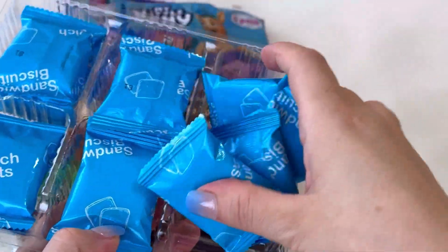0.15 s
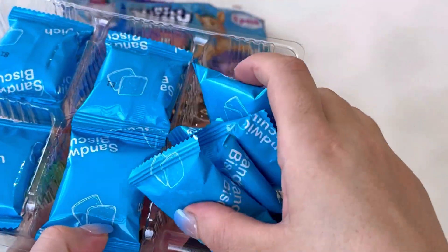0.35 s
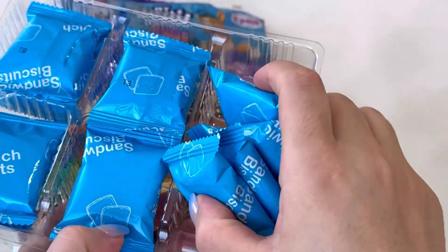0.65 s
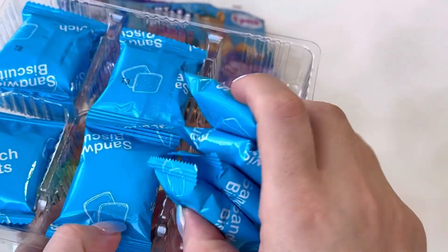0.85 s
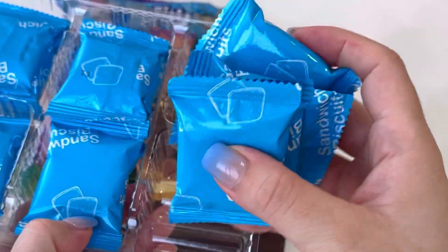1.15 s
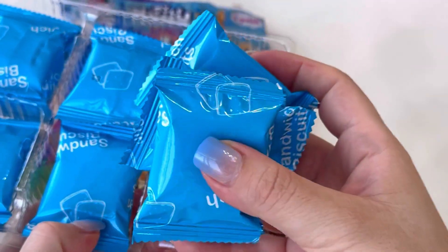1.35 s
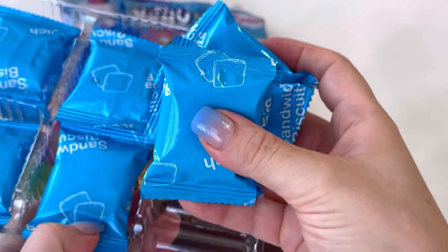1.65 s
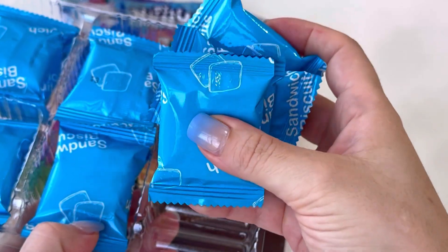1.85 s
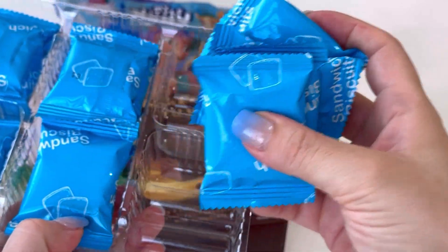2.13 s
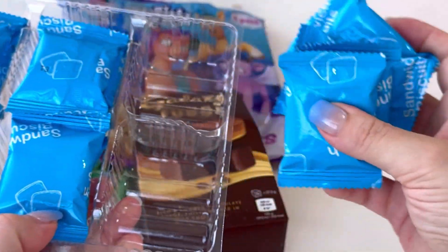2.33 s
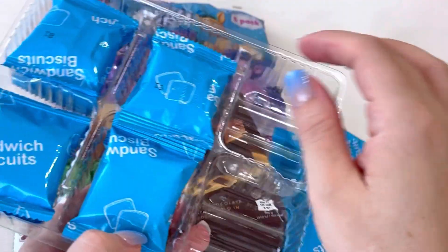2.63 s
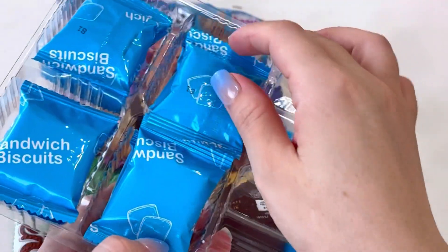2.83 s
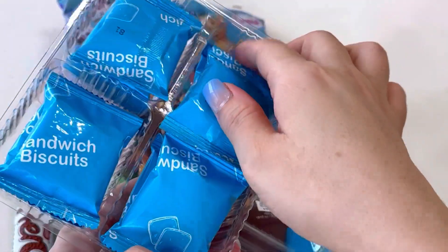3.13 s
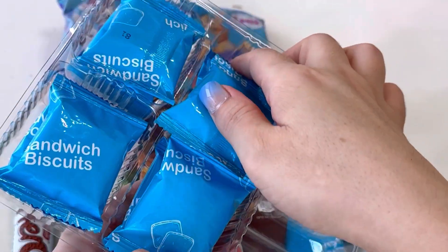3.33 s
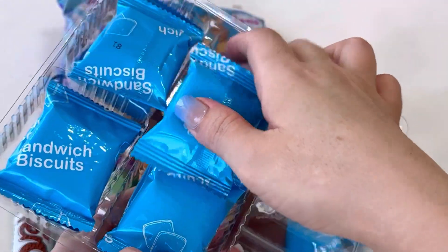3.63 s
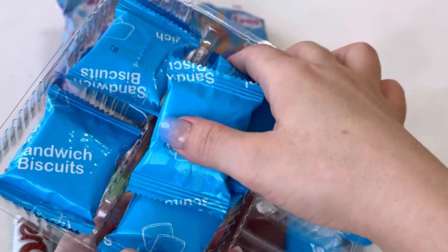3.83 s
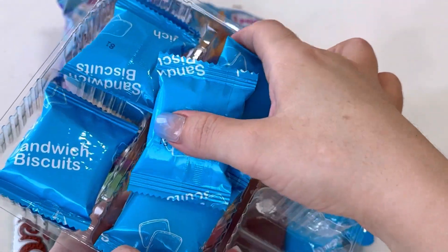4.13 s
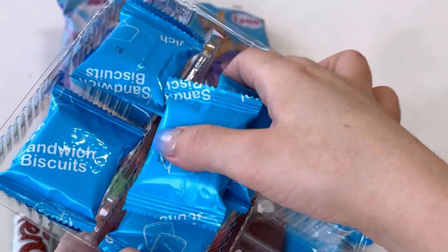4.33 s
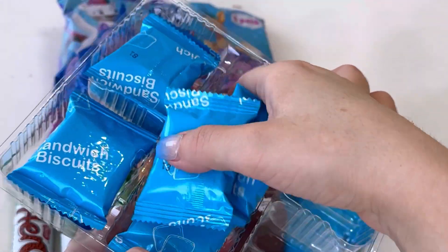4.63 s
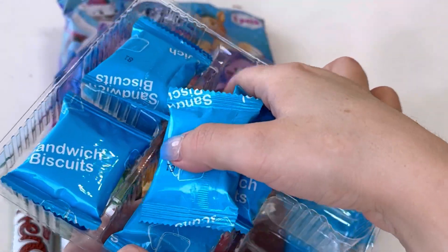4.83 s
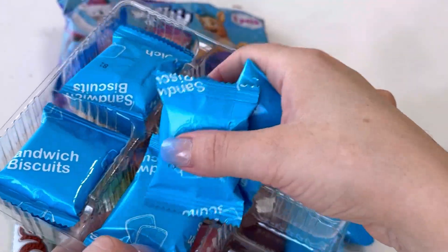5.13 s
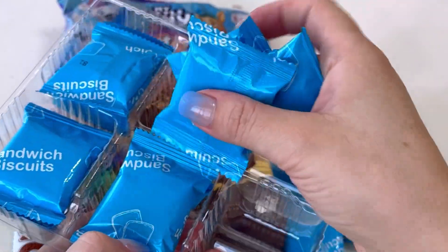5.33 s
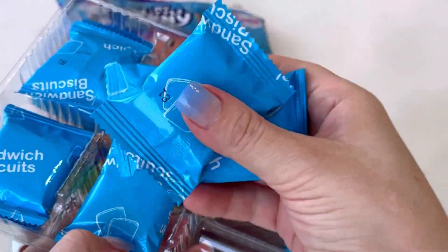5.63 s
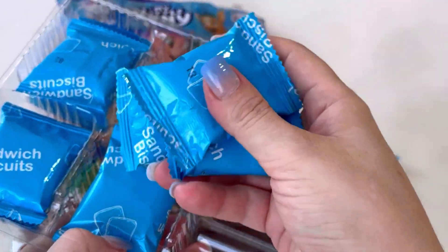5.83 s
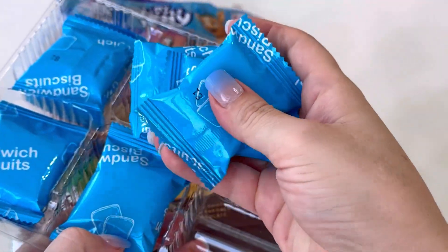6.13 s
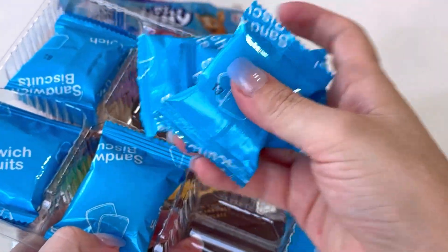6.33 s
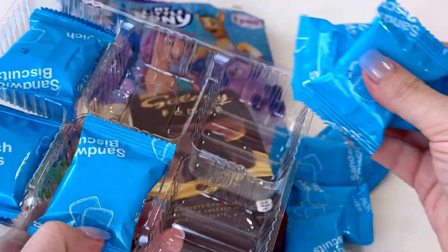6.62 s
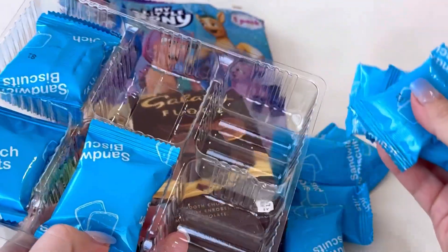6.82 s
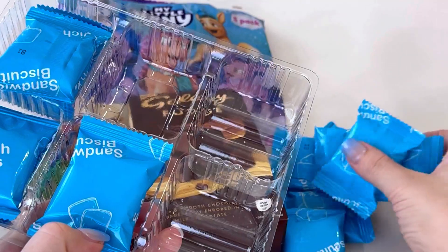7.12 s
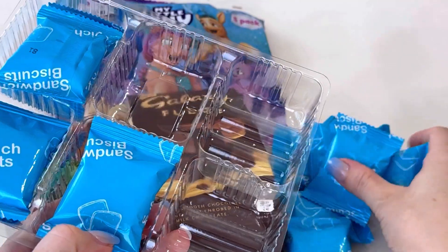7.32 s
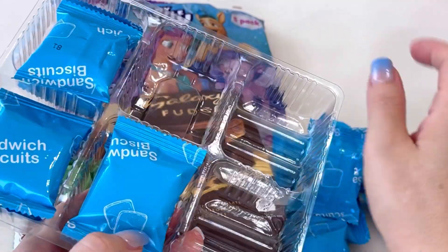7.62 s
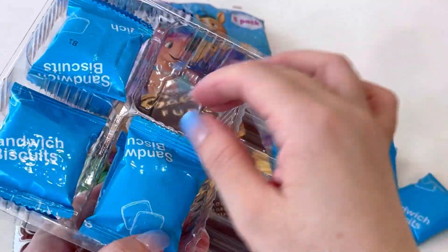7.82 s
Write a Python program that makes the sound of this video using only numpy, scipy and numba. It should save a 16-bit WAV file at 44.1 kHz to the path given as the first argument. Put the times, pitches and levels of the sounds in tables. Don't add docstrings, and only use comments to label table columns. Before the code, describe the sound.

Fingers grab wrapped biscuits: dry film crackle and hollow plastic ticks for about a second, then near quiet with tiny rustles. Digging starts again with thick crunchy crinkling, peaking in hard pops that leave the tray briefly ringing. It eases into lighter crinkles, a brush of film and dull low bumps on a table. Close stereo pickup, light room echo, steady low hum.

```python
import sys
import numpy as np
from scipy import signal
from scipy.fft import rfft, irfft
from scipy.io import wavfile
from scipy.ndimage import uniform_filter1d
from numba import njit

SR = 44100
rng = np.random.default_rng(int(sys.argv[2]) if len(sys.argv) > 2 else 0)


def store_wav(level_fs):
    pcm = np.round(np.clip(np.atleast_2d(level_fs), -1, 1) * 32767)
    wavfile.write(sys.argv[1], SR, pcm.T.astype(np.int16))


def decibels_to_gain(level_db):
    exponent = np.asarray(level_db, float) / 20
    return 10 ** exponent


N = 351456
LEFT_RIGHT = np.array([[1], [-1]])


def level(x, db):
    return x * decibels_to_gain(db) / np.sqrt(np.mean(x ** 2))


def curve(table, column):
    rows = np.array(table, float)
    return np.interp(np.arange(N) / SR, rows[:, 0], rows[:, column], left=-120, right=-120)


def shaped(gain, channels=1):
    hz = np.maximum(np.fft.rfftfreq(N, 1 / SR), 1)
    noise = rng.standard_normal((channels, N))
    return level(irfft(rfft(noise) * gain(hz), N), 0)


def resonance(f, hz, width):
    return 1 / np.hypot(1, 2 * (f - hz) / width)


def walk(rate):
    held = int(SR / rate)
    steps = np.repeat(rng.standard_normal(N // held + 1), held)
    return uniform_filter1d(steps, held // 2)[:N]


def bells(table):
    t = np.arange(N) / SR
    return [(row, np.exp(-((t - row[0]) / row[-1]) ** 2)) for row in table]


# pitch in Hz, width in Hz, level in dB.
HUM_LINES = [
    (50, 38, -62.5),
    (99.3, 17, -62.5),
    (196, 25, -72.5),
    (522, 14, -78.5),
]
# pitch in Hz, strength in dB per Hz.
AIR_COLOUR = [(25, -38.5), (45, -8.5), (70, -41), (130, -16), (280, -22.5), (600, -41), (3000, -60.5),
              (16000, -73)]


def background():
    turn = 2 * np.pi * np.arange(N) / SR
    hum = 0
    for hz, width, db in HUM_LINES:
        steady = (1.1 if hz < 150 else .3) * np.sin(hz * turn)
        unsteady = 0.79 * shaped(lambda f: resonance(f, hz, width))
        hum = hum + decibels_to_gain(db) * (steady + unsteady)
    hz, db = np.transpose(AIR_COLOUR)
    mid, side = shaped(lambda f: decibels_to_gain(np.interp(np.log(f), np.log(hz), db)), channels=2)
    return hum + decibels_to_gain(-68) * (mid + .2 * side * LEFT_RIGHT)


# start in seconds, strength in dB, sharpness in dB, share of the tray in dB.
GRAB = [(0.052, -41, -13, 8), (0.0825, -45.5, 13.5, -20.5), (0.0881, -31, 6, -3.5), (0.1221, -26, 13, -23),
        (0.218, -43.5, -8.5, 4), (0.2394, -42.5, 7, -31), (0.328, -27.5, -3.5, -5),
        (0.3689, -54, -1.5, -18), (0.3846, -47.5, 35, -31), (0.4815, -33.5, -2, -5.5),
        (0.4936, -33, 2.5, -6.5), (0.5244, -52.5, 23.5, -8), (0.5553, -40, -2, 1.5),
        (0.5681, -39, 16.5, -6.5), (0.5905, -31, -4.5, -4.5), (0.6103, -33, 4, -18.5),
        (0.6265, -38, 16.5, -32), (0.6514, -25.5, 4, -7.5), (0.6834, -33, -5.5, 1), (0.7053, -26, -1, -3),
        (0.7415, -35, -14, -3), (0.7489, -33, 4.5, -1.5), (0.791, -49.5, -8, 9), (0.8779, -32, -4, -2.5),
        (0.89, -36, -12, 2.5), (0.9925, -55.5, 16, 6), (1.019, -47.5, -14, 12), (1.0415, -44, 0, 7.5),
        (1.2622, -54.5, 17.5, -16)]
TURN = [(1.4868, -43.5, 0, -9.5), (1.504, -48, 3, -9), (1.5193, -47, 3.5, -52), (1.6334, -50.5, 17, -33),
        (1.6661, -37.5, 15, -16), (1.6719, -35, 0, -20), (1.6793, -44.5, 22, -7), (1.6861, -57, 27, -22),
        (1.871, -52, -5, -19), (1.9095, -44.5, 5, -27), (1.9655, -51.5, -4, -11), (2.0667, -51, -3, -3.5),
        (2.259, -66, 4, -10), (2.2825, -67.5, -1, -9.5), (2.305, -69, 10, -7), (2.3417, -71, 13, 2),
        (2.353, -63, 6, -7), (2.3932, -53, 1, -10), (2.4, -50.5, -1, -52.5), (2.417, -55.5, 9, -6.5),
        (2.5382, -59, -7, -29.5), (2.6074, -56.5, -15, 12.5)]
DIG = [(2.8805, -43.5, -15, 5), (2.913, -43, -7, 5), (3.0061, -47.5, 19, -1), (3.1022, -36.5, -2, 5),
       (3.1173, -35, -2, -6), (3.1388, -36.5, 19.5, -13), (3.1847, -28, -10.5, -12.5),
       (3.304, -31, 1.5, -21.5), (3.3538, -36, -2, -11), (3.3637, -27.5, 4.5, -8.5),
       (3.4291, -27, -7.5, -0.5), (3.439, -36.5, 21.5, -0.5), (3.515, -31.5, -10.5, -2.5),
       (3.5243, -34, -5, 3), (3.535, -39.5, 3, -19), (3.574, -37.5, -9, -4), (3.59, -27.5, 3, -13),
       (3.5953, -28.5, -15, -2.5), (3.603, -29, 8, -10), (3.608, -27.5, -9, 2), (3.6242, -25, 2, -17.5),
       (3.664, -29, -9, 2), (3.685, -37, -17.5, 1), (3.694, -38, 7.5, 7), (3.726, -39, 22, -33),
       (3.7295, -44, -24.5, 12.5), (3.7536, -33, 11, -13.5)]
PULL = [(3.842, -42, -12.5, -5), (3.857, -33.5, -4.5, -1.5), (3.873, -29.5, -5, -8),
        (3.9015, -30, -1.5, -1), (3.9827, -25.5, -0.5, -18.5), (3.999, -30.5, 0.5, -2.5),
        (4.006, -39, 4.5, 9), (4.02, -38, 8, -16), (4.0279, -24.5, 2.5, -14), (4.0872, -41.5, -11, 4.5),
        (4.1045, -38.5, 9.5, -30.5), (4.1332, -45.5, 1.5, 9.5), (4.146, -35, -6.5, -10.5),
        (4.2376, -32, 2.5, -15.5), (4.258, -20.5, 3.5, -11), (4.2634, -21, 3, -19), (4.2678, -15, 1, -2.5),
        (4.2697, -47, 3, -2), (4.2771, -29, -10.5, 7.5), (4.2875, -27.5, 7, 1.5), (4.3412, -30.5, 1, -9.5),
        (4.357, -37.5, 12, -17.5), (4.413, -45.5, -10, 9.5), (4.458, -39, 2.5, -30.5),
        (4.4704, -51, 6, -12.5), (4.481, -43.5, 21, -15), (4.492, -50.5, 19.5, -20), (4.5054, -35, -4, -27)]
LIFT = [(4.5563, -48.5, -13, 2), (4.569, -31, 6, -3), (4.575, -36.5, -12, 6), (4.589, -18, -4, -9),
        (4.5949, -14, 1, -6.5), (4.656, -28, 2, -37), (4.7143, -29.5, 0, -11.5), (4.7348, -24, 4, -8.5),
        (4.7515, -26, 4, -36.5), (4.842, -13, -4.5, -10), (4.9346, -34.5, -1.5, 1), (4.983, -42, 21, -20),
        (4.994, -30, 1.5, -1), (4.9996, -24, 10, -34), (5.0147, -24, 10, -12), (5.0535, -27, -3.5, -1),
        (5.0815, -38, 13.5, -8), (5.1775, -23, 10, -5), (5.2211, -28.5, 17, -31), (5.4235, -48.5, 4, -29),
        (5.454, -43, 7, -13), (5.476, -45, -8, -3), (5.4905, -39, -3, -51), (5.5463, -20, 1, -11.5),
        (5.661, -39.5, 10.5, -32), (5.688, -35.5, 0, -39), (5.7276, -36.5, 3.5, -26),
        (5.9295, -41.5, -3, -14)]
DROP = [(6.288, -39.5, 2, -36), (6.32, -37.5, 2.5, -54), (6.3915, -46.5, -17.5, -28), (6.4654, -37, 9, -13),
        (6.565, -35, 17.5, -25), (6.568, -32.5, 16, -28), (6.591, -35, 8, -17), (6.597, -43.5, -33, 5),
        (6.606, -35.5, -11, 5.5), (6.6142, -35, 16.5, 1.5), (6.6394, -35.5, -5, 0.5),
        (6.7646, -44, 3, -1.5), (6.772, -21, 8.5, -6.5), (6.802, -44, -12, -24), (6.9734, -40.5, 7.5, -27),
        (7.0818, -35, 2.5, -8), (7.1517, -42, 0.5, -4), (7.227, -38, 0, 2.5), (7.2426, -35, 0, -10),
        (7.2882, -46, -18, 0), (7.34, -50.5, -23, 4), (7.371, -31.5, 2.5, -6), (7.444, -54, -11, 17),
        (7.462, -52.5, -38, 11.5), (7.5415, -38.5, -2, -1.5), (7.6242, -31.5, 8, -2), (7.7365, -46, 9, -29)]
TICKS_EARLY = [(0.0958, -37, 1, -8), (0.2484, -44.5, 12, -14), (0.9329, -58, 10, -15),
               (0.9763, -53.5, -2, 9), (1.1045, -70, 1, -13), (1.1683, -58.5, 10, -21),
               (1.4357, -75.5, 7.5, -6), (1.8852, -61, 4, -16), (1.98, -52, -4, -7),
               (2.0279, -52.5, -3.5, -18), (2.2943, -76.5, 3, -9), (2.3172, -75, -1, -9),
               (2.375, -62, 0, -17), (2.4085, -50.5, 5, -30), (2.423, -59, -1, -22), (2.5068, -64, 4, -32),
               (2.6141, -59, -6, -1), (2.6195, -53.5, -6, 9), (2.9912, -60, 6, -2), (3.1069, -40, -7, -18),
               (3.1937, -47, 19, -2), (3.3718, -43, 10, -18), (3.4457, -43, -16, 3), (3.5464, -44, -1, -14),
               (3.6163, -37.5, -21, -4), (3.7106, -40, 2, -9.5), (3.7639, -38, -7, -18),
               (3.8492, -48, 2, -10.5), (3.8917, -47, -9, -5), (4.0937, -37, -9, -8)]
TICKS_LATE = [(4.2225, -47, -4.5, -10.5), (4.2389, -31, 8, -19), (4.248, -38, -27, -2),
              (4.329, -43, -5.5, -17), (4.451, -44, -14, -13.5), (4.6112, -30, -7.5, -10),
              (4.622, -30, -7, -19), (4.682, -36, -9.5, -19.5), (4.86, -35, 6, -28),
              (4.9026, -36.5, -23, -11), (4.9435, -39.5, -13, 9), (5.4338, -48.5, 5, -15),
              (5.442, -47, 0, -23), (5.6222, -49, 7, -16), (5.704, -39, 0, -22), (5.7079, -41, -1, -3),
              (5.7467, -43.5, 0, -11), (5.917, -59, -1, -15), (6.0063, -64, -2, -17),
              (6.1127, -59, 2.5, -16.5), (6.1615, -66.5, 13, -20.5), (6.271, -58, -2, -2),
              (6.3388, -45.5, 1.5, -5), (6.492, -56, 8, -22), (6.81, -35.5, -4, -10), (6.946, -50, 2, -12),
              (7.138, -53, 4, -18), (7.1904, -42, -4, -6.5), (7.4023, -48, -10, -6), (7.5205, -59, 14, -12),
              (7.6396, -49.5, 14.5, -18)]
TICKS_THIN = [(0.425, -52.5, 9, -15), (0.6561, -39, 11, -18), (0.71, -37, 8, -7), (1.22, -58, -9, 7),
              (2.014, -67.5, 14, -15), (3.5943, -38.5, 15, -20), (3.658, -46, 10, -12.5),
              (3.961, -59, 16, -13), (4.137, -52.5, 23, -24), (4.205, -58.5, 20, -25.5),
              (4.556, -57, 24, -19.5), (4.765, -48.5, -1, -15), (6.075, -61, 17, -20), (6.279, -61, -12, 5),
              (6.624, -41, 10, -21), (7.362, -56, 8, -15), (7.38, -41, 6, -13.5), (7.438, -56, 14, -21),
              (7.261, -42, -2, -7)]


def creases(*moves):
    s, db, sharp_db, tray_db = np.vstack(moves or [GRAB, TURN, DIG, PULL, LIFT, DROP]).T
    edge_db = 2 + 1.1 * db + 0.8 * sharp_db
    return np.array([s, db + tray_db, db - sharp_db / 2, db + sharp_db / 2, edge_db]).T


def unrest(grip_db, snap_db, after_db, settle_s):
    stirred = np.zeros(N)
    stirred[(creases()[:, 0] * SR).astype(int)] = decibels_to_gain(snap_db + after_db) ** 2
    settling = signal.lfilter([1], [1, -decibels_to_gain(-120 / (settle_s * SR))], stirred)
    return 10 * np.log10(decibels_to_gain(grip_db) ** 2 + settling)


def rustle(db, low_hz, high_hz, rate, spread_db, length):
    swarm_per_s = 40
    chance = rng.random((N, 2)).T
    tick_db = np.minimum(-spread_db * np.log(1 - chance[1]), 15)
    ticks = (chance[0] < rate / SR) * decibels_to_gain(tick_db)
    bursts = signal.lfilter([1], [1, -np.exp(-1 / (length * SR))], ticks)
    swarm = decibels_to_gain(db + 2.2 * walk(swarm_per_s))
    slide = decibels_to_gain(-6)
    mid, side = rng.standard_normal((2, N)) * np.hypot(level(bursts, 0), slide) * swarm
    both = mid + (0.23 * side + .06 * mid) * LEFT_RIGHT
    band = signal.butter(1, [low_hz, min(high_hz, .45 * SR)], "band", fs=SR, output="sos")
    hiss = signal.sosfilt(band, both) * np.sqrt(SR / 4 / (high_hz - low_hz))
    lows = []
    for hz in np.geomspace(low_hz, high_hz, num=5)[1:]:
        lows.append(signal.sosfilt(signal.butter(2, hz, fs=SR, output="sos"), hiss))
    patches = np.diff([0 * hiss, *lows, hiss], axis=0)
    return sum(patch * decibels_to_gain(2.8 * (walk(swarm_per_s / 2) - .5)) for patch in patches)


# lowest Hz, highest Hz, ticks per second, spread in dB, length in seconds.
TRAY_GRAINS = (257, 1480, 99, 37, 0.019)
# level against the snap in dB, seconds to fade by 60 dB.
TRAY_AFTER = (-14.5, 0.22)


def tray_rustle(grip_db):
    _, tray_db, pack_db, _, _ = creases().T
    shake_db = np.maximum(tray_db, pack_db - 12.5)
    return rustle(unrest(grip_db, shake_db, *TRAY_AFTER), *TRAY_GRAINS)


# middle in seconds, level in dB, half length in seconds.
FINGER_STROKES = [
    (1.551, -69, 0.057),
    (1.72, -55, 0.04),
    (2.018, -59.5, 0.057),
    (2.399, -60.5, 0.022),
    (2.547, -71.5, 0.082),
    (5.83, -49, 0.014),
    (6.365, -59, 0.055),
    (7.32, -53, 0.15),
    (7.683, -55, 0.044),
]


def rubs():
    return sum(decibels_to_gain(db) ** 2 * bell for (_, db, _), bell in bells(FINGER_STROKES))


FILM_GRAINS = (2400, 11300, 490, 17, 0.0022)
FILM_AFTER = (-22.5, 0.36)


def film_rustle(grip_db):
    film_db = creases()[:, 3]
    touch_db = 10 * np.log10(decibels_to_gain(grip_db) ** 2 + rubs())
    return rustle(unrest(touch_db, film_db, *FILM_AFTER), *FILM_GRAINS)


@njit
def ring(start, hz, t60, rise, left, right):
    out = np.zeros((2, N))
    for g in range(len(start)):
        z = 1 + 0j
        spin = np.exp((2j * np.pi * hz[g] - np.log(1000) / t60[g]) / SR)
        late = 1.
        swell = np.exp(-1 / (rise[g] * SR))
        for i in range(start[g], min(N, start[g] + int(t60[g] * SR))):
            z = z * spin
            late = late * swell
            out[0, i] += left[g] * (1 - late) ** 2 * z.imag
            out[1, i] += right[g] * (1 - late) ** 2 * z.imag
    return out


def strike(s, hz, t60, rise, db, chance):
    size = decibels_to_gain(db) * np.sign(chance[0] - .5)
    lean_db, spread_db = 0.66, 1.2
    pan = decibels_to_gain(lean_db / 2 + spread_db * (2 * chance[1] - 1))
    start = np.clip(s * SR, 0, N - 1).astype(np.int64)
    return ring(start, hz, np.clip(t60, .001, 1), np.clip(rise, 1e-5, 1), size * pan, size / pan)


# lowest Hz, highest Hz, seconds to fade by 60 dB, rise in seconds, gain in dB,
# number of modes, crease level that drives it (1 tray, 2 pack, 3 film, 4 edge).
SNAP_PARTS = [
    (109, 290, 0.039, 0.0026, -6.5, 4, 1),
    (315, 1000, 0.029, 0.00199, 6, 10, 1),
    (1001, 2910, 0.015, 0.0008, 5.5, 12, 2),
    (2826, 7900, 0.0081, 0.00045, 10, 20, 3),
    (7820, 17000, 0.0069, 0.0004, 10, 24, 4),
    (1660, 10000, 0.0018, 0.00011, 11, 12, 3),
]


def snaps(rows):
    out = 0
    slope = np.gradient(rows[:, 1:], axis=1)
    for low_hz, high_hz, t60, rise, db, modes, column in SNAP_PARTS:
        count, k = round(modes), round(column)
        chance = rng.random((len(rows), count, 5)).T
        place = (np.arange(count)[:, None] + chance[2]) / count
        hz = low_hz * (high_hz / low_hz) ** place
        is_click = t60 < .005
        if is_click:
            chance[0], chance[3] = chance[0, 0], .6
        s = rows[:, 0] - .0007 + .0009 * is_click + 2.1 * rise * chance[3] ** 2
        loud = rows[:, k] + db - 10 * np.log10(count)
        loud = loud + 11 * (chance[4] - .6) + 1.11 * slope[:, k - 1] * (place - .5)
        flat = np.ones(hz.size)
        signs = chance[:2].reshape(2, -1)
        out = out + strike(s.ravel(), hz.ravel(), t60 * flat, rise * flat, loud.ravel(), signs)
    return out


# start in seconds, pitch in Hz, level in dB, seconds to fade by 60 dB.
WALLS = [(0.124, 4340, -14.5, 0.013), (0.327, 1566, -11, 0.014), (0.327, 2040, -26.5, 0.015),
         (.652, 650, -18.5, 0.034), (0.654, 1330, -17, 0.036), (0.707, 1244, -26, 0.073),
         (0.704, 3480, -21, 0.024), (1.04, 690, -34, .04), (1.037, 1316, -28.5, 0.035),
         (1.634, 4980, -34, 0.0077), (1.909, 3450, -41, 0.0072), (2.609, 736, -40.5, .04),
         (3.185, 2910, -24.5, .02), (3.61, 1166, -13.5, 0.037), (4.267, 1140, -14.5, .04),
         (4.27, 278, -29, .06), (4.283, 393, -26, 0.047), (4.594, 1690, -10, 0.027),
         (4.592, 3180, -11, 0.03), (4.841, 1740, -8.5, .03), (4.84, 3420, -10.5, 0.021),
         (4.858, 3270, -24, 0.041), (5.544, 338, -21.5, 0.025), (5.546, 2130, -21.5, 0.014),
         (6.288, 3580, -21, 0.0048), (6.568, 4450, -15.5, 0.0063), (6.598, 603, -20, 0.026),
         (6.607, 676, -19, 0.03), (6.64, 845, -29, .05), (7.232, 560, -35.5, 0.036),
         (7.466, 1000, -42, 0.016), (7.54, 2000, -22, 0.0097)]


def panels():
    s, hz, db, t60 = np.transpose(WALLS)
    return strike(s, hz, np.minimum(t60, 22 / hz + .006), 1 / hz, db, rng.random((len(s), 2)).T)


# start in seconds, lowest Hz, highest Hz, level in dB, seconds to fade by 60 dB.
DRAGS = [
    (2.68, 2600, 4500, -73.5, 0.87),
    (3.19, 2400, 3200, -66, 0.29),
    (4.85, 2600, 3680, -46, 0.79),
    (5.79, 1780, 5340, -48.5, .3),
    (7.63, 5100, 7320, -49, 0.66),
]


def brush():
    out = 0
    for start, low_hz, high_hz, db, t60 in DRAGS:
        t = np.arange(N) / SR - start
        hiss = shaped(lambda f: 1 / np.hypot(1, (low_hz / f) ** 4) / np.hypot(1, (f / high_hz) ** 4))
        fade = decibels_to_gain(db - 60 * np.maximum(t, 0) / t60)
        out = out + hiss * fade * np.clip(t / .02, 0, 1)
    return out


# pitch in Hz, width in Hz, lift in dB.
TRAY_TONES = [
    (607, 31, -12.5),
    (1189, 187, -1),
    (1665, 110, -3.5),
    (3124, 1300, -13),
]


def tray_body(x):
    f = np.fft.rfftfreq(N, 1 / SR)
    lift = sum(decibels_to_gain(db) / (1 + 2j * (f - hz) / width) for hz, width, db in TRAY_TONES)
    return irfft(rfft(x) * (1 + lift), N)


# time in seconds, level in dB.
LANDINGS = [
    [(6.74, -77), (6.78, -40), (6.95, -79)],
    [(7.4, -58.5), (7.63, -50.5), (7.72, -46), (7.85, -62), (7.97, -66.5)],
]
# pitch in Hz, width in Hz, level in dB.
BOARD_MODES = [
    (88, 160, -1),
    (246, 49, -7.5),
]


def table_top():
    push = sum(decibels_to_gain(curve(landing, 1)) for landing in LANDINGS)
    wobble = 0
    for hz, width, db in BOARD_MODES:
        wobble = wobble + decibels_to_gain(db) * shaped(lambda f: resonance(f, hz, width) ** 2)
    return push * wobble


# middle in seconds, pitch in Hz, level in dB, half length in seconds.
BOARD_ROCKS = [
    (7.687, 85.2, -43, 0.029),
    (7.744, 88, -42, 0.023),
    (7.836, 88, -39, 0.023),
    (7.922, 91.9, -45, 0.026),
]


def rocking():
    t = np.arange(N) / SR
    return sum(decibels_to_gain(db) * bell * np.sin(2 * np.pi * hz * t) for (_, hz, db, _), bell in bells(BOARD_ROCKS))


# pitch in Hz, seconds to fade by 60 dB, level in dB.
ROOM_BANDS = [
    (296, 0.91, -6),
    (660, 0.56, -6),
    (2000, 0.59, -7),
    (5120, 0.61, -10),
    (10300, 0.28, -12.5),
]


def room(x):
    t = np.arange(SR) / SR
    mid, side = rng.standard_normal((2, len(t)))
    wash = mid + 0.19 * side * LEFT_RIGHT
    build_up = 1 - np.exp(-t / 0.00086)
    echo = 0
    for hz, t60, db in ROOM_BANDS:
        band = signal.sosfilt(signal.butter(2, [hz / 1.6, hz * 1.6], "band", fs=SR, output="sos"), wash)
        echo = echo + decibels_to_gain(db - 60 * t / t60) * band * build_up / np.sqrt(t60 * SR / 14)
    return signal.fftconvolve(x.mean(axis=0, keepdims=True), echo, axes=1)[:, :N]


# time in seconds, pressure in dB, film over tray in dB.
GRIP = [(0.0, -39, -7), (0.35, -60.5, 0), (0.73, -48.5, -22), (1.15, -69.5, 3), (1.4, -83.5, 4),
        (1.8, -77, 1), (2.2, -86.5, -1), (2.65, -70.5, -9), (2.95, -83.5, -10.5), (3.1, -65.5, 7.5),
        (3.64, -45.5, -10), (4.1, -69.5, 8), (4.88, -46.5, -0.5), (5.39, -67, 6.5), (5.68, -60.5, 10.5),
        (6.25, -86.5, 15.5), (6.7, -57, 2), (7.6, -60.5, 0), (7.97, -71, -18)]


def scene():
    grip_db = curve(GRIP, 1)
    tray = tray_rustle(grip_db)
    film = film_rustle(grip_db + curve(GRIP, 2))
    fine_ticks = snaps(creases(TICKS_EARLY, TICKS_LATE, TICKS_THIN))
    near = tray_body(snaps(creases()) + fine_ticks + tray + film + brush()) + panels()
    return near + room(near) + table_top() + rocking() + background()


def low_pass(x):
    return signal.sosfilt(signal.butter(12, 17000, fs=SR, output="sos"), x)


# pitch in Hz, gain in dB.
MIC_REACH = [(20, -30), (42, 0), (15150, 0), (15500, -8), (16750, -10), (17050, -40)]
# pitch in Hz, lead of the left in radians.
PORT_LEAD = [(0, 0), (1460, -.1), (3360, .5), (7060, -.3), (8350, 0), (9300, -2.95), (9640, -3.35),
             (12450, -9.2), (12800, -9.65), (15900, -16.3)]


def record(dry):
    f = np.fft.rfftfreq(N, 1 / SR)
    left, right = rfft(dry) * decibels_to_gain(np.interp(f, *np.transpose(MIC_REACH)))
    mid = (left + right) / 2
    side = (left - right) / 2 * 1.78 / np.hypot(1, (f / 3700) ** 3)
    turn = np.exp(.5j * np.interp(f, *np.transpose(PORT_LEAD)))
    mix = irfft(np.array([(mid + side) * turn, (mid - side) / turn]), N)
    return low_pass(mix)


dry = scene()
out = record(dry)
store_wav(out)
```